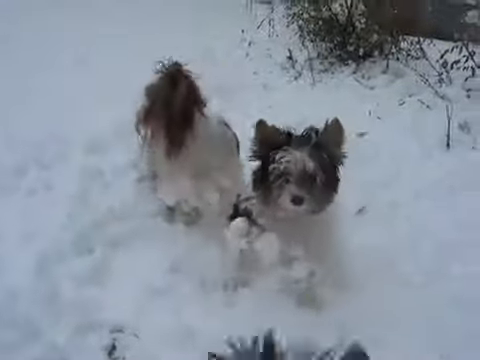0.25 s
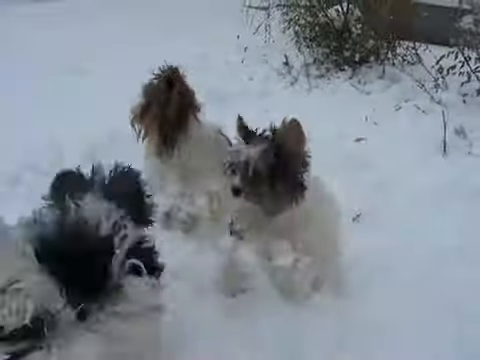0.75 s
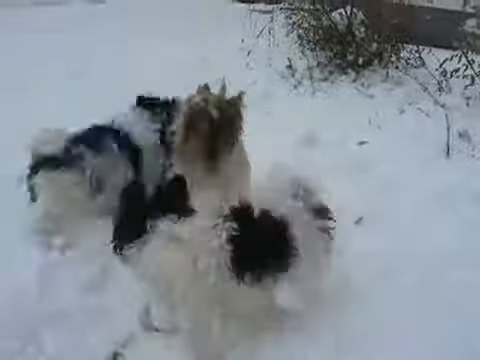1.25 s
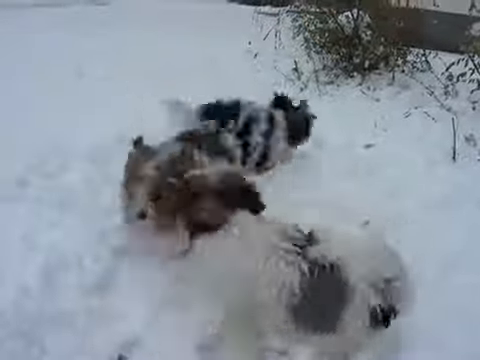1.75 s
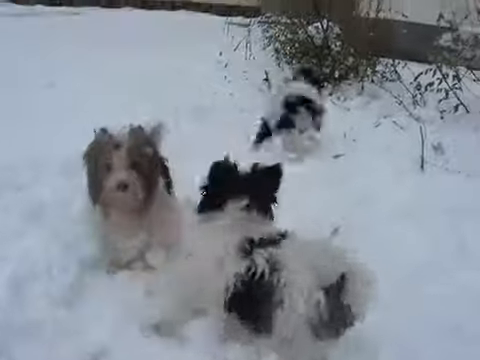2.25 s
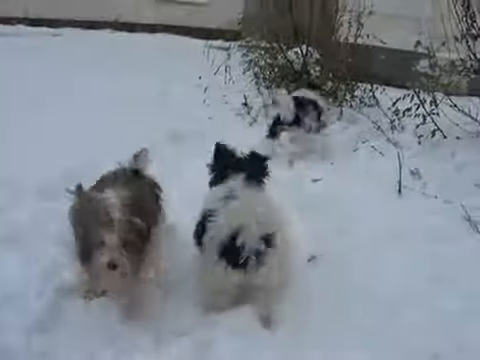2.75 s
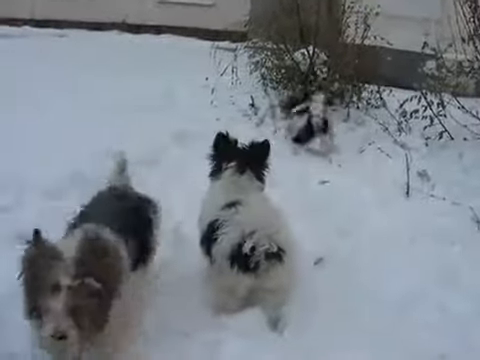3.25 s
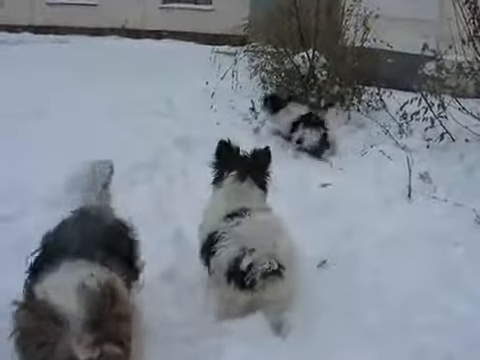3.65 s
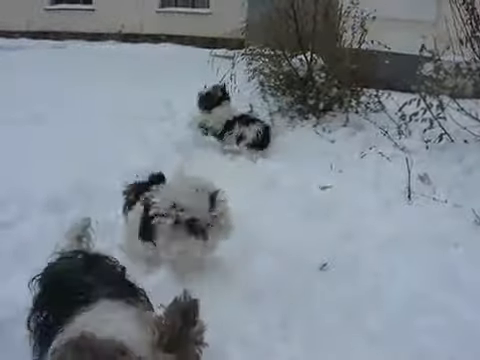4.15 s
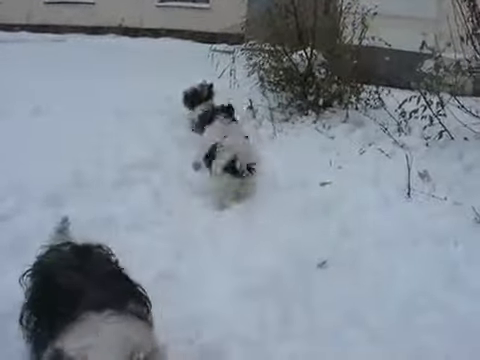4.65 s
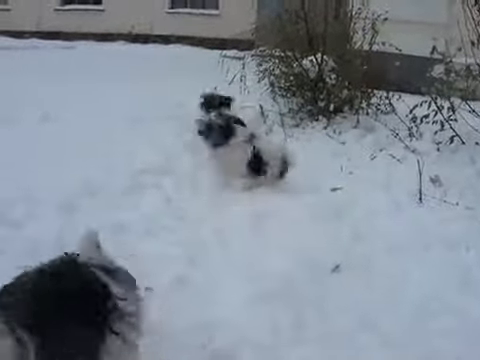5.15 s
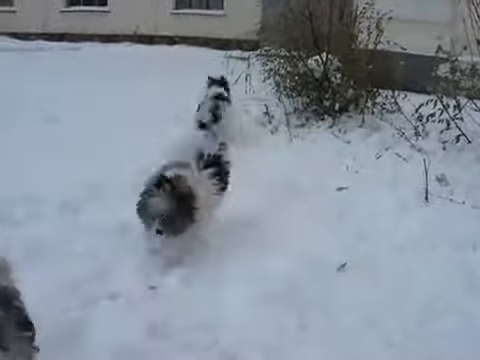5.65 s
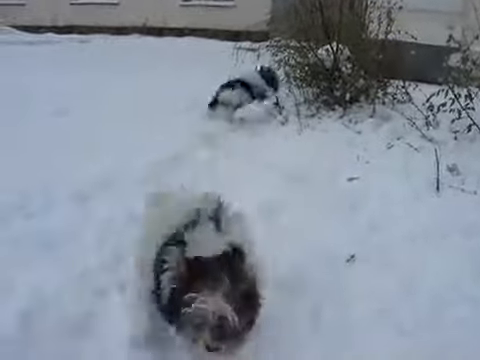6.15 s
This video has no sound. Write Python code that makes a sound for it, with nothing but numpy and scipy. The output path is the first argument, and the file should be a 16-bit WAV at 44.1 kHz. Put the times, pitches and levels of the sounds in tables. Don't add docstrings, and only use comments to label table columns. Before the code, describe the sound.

A constant dull broadband hiss with low traffic rumble and a slight hum fills a snowy yard, captured by a cheap, narrow-band microphone. From 0.2 to 0.7 s small paws tick and crunch lightly, with a few more steps at 1.0 to 1.2 s. A quick wavering double whimper comes at 1.55 to 1.65 s. At 1.9 s a puppy barks piercingly, the loudest moment, cracking into rasp and sliding into a short falling tail by 2.0 s; it overloads, the background ducks and slowly recovers, and walls answer with brief echoes. A short rising yip sounds at 2.5 s and a falling one at 2.75 s, ending low. After a pause, a clear high bark rings at 3.95 s. A faint growl mutters around 4.4 to 4.7 s. At 5.0 s comes a rough, hoarse, distorted bark with another dip. A barely audible whine at 5.7 s and soft steps finish by 6.4 s.

```python
import sys
import numpy as np
from scipy import signal
from scipy.fft import rfft, irfft
from scipy.io import wavfile
from scipy.ndimage import uniform_filter1d, map_coordinates

SR = 44100
rng = np.random.default_rng(int(sys.argv[2]) if len(sys.argv) > 2 else 0)


def transcribe(u):
    v = np.clip(np.atleast_2d(u).T, -1, 1)
    q = np.round(v * 32767).astype(np.int16)
    wavfile.write(sys.argv[1], SR, q)


def rack_gain(trim_db):
    fader = np.asarray(trim_db, float)
    return 10 ** (fader / 20)


N = 282725
T = np.arange(N) / SR

# time_s, level_db
HISS_LEVEL = [(0, -42.5), (.6, -42.5), (1.6, -42), (2.1, -40.5), (2.9, -43), (4.2, -42), (4.9, -44),
              (5.6, -41.5), (6.2, -42.5), (6.41, -40)]
# frequency_hz, density_db (per Hz)
HISS_SPECTRUM = [(38, -5), (90, -2.5), (333, -8.5), (544, -4), (888, -3.5), (1280, -9), (3700, -21),
                 (4400, -43)]
HUM_DB, RUSTLE_DB, TRAFFIC_DB = -57, -62, -6.5
# centre_s, rise_db, half_width_s
TRAFFIC_SWELLS = [(1.1, 5, .7), (3.5, 3.3, 0.89), (4.6, 3, 0.54), (6.41, 1.5, 0.14)]
HUM_SWELLS = [(.25, 8, 0.43), (1.0, 5, .2), (1.9, 5.5, .2), (2.5, 6, 0.37), (3.3, 5.5, 1), (4.7, 10, 0.53),
              (6.15, 8, 0.33)]
RUSTLE_SWELLS = [(.2, 8.5, 0.21), (2.15, 22.5, 0.18), (2.7, 10, 0.27), (4.3, -13, 0.42), (5.25, 13.5, 0.43),
                 (6.28, 13, 0.15)]

# start_s, peak_db, thud_hz, crunch_db, crunch_length_s
PAW_STEPS = [(0.21, -32.5, 500, -46, 0.01), (0.252, -39, 500, -60, .008), (0.308, -45, 500, -50, .006),
             (0.388, -30.5, 700, -42, 0.0032), (0.59, -28.5, 590, -44, 0.0043),
             (.672, -41, 450, -44, 0.017), (0.697, -38, 436, -44, 0.015), (.718, -38, 600, -47, .01),
             (1.002, -38, 900, -31.5, 0.0023), (1.006, -34, 700, -33, 0.005), (1.197, -41, 131, -58, .01),
             (1.212, -53, 120, -63, .01), (4.088, -38.5, 600, -44, 0.0039), (5.688, -39, 500, -42, 0.0075),
             (5.879, -47, 900, -40.5, 0.022), (6.1, -35.5, 600, -33.5, 0.0019),
             (6.276, -36, 415, -42, 0.0046)]
# time_s, level_db
GROWL_LEVEL = [(4.33, -63), (4.38, -41), (4.48, -41), (4.55, -46.5), (4.65, -49), (4.72, -46)]
# delay_s, level_db, smear_s
WALL_ECHOES = [(0.157, -46, 0.002), (0.19, -40, 0.01), (.25, -39.5, 0.0035), (0.284, -58, 0.041),
               (.44, -48.5, 0.0055)]
# delay_s, level_db
DIFFUSE_RETURN = [(.02, -36.5), (.1, -31), (.2, -42.5), (.3, -40), (.4, -44.5), (.6, -48.5), (.9, -58.5)]

# time_s, pitch_hz, level_db, mouth_opening_db (second over first partial), rasp_db (over clean voice)
WHIMPER_FIRST = [(1.541, 815, -33.5, -12, -30), (1.548, 774, -30, -4, -34), (1.56, 675, -29, -11.5, -28.5),
                 (1.567, 814, -22.5, -21, -31.5), (1.573, 830, -32.5, -16, -24.5)]
WHIMPER_SECOND = [(1.578, 638, -36, -13, -14), (1.589, 593, -31.5, -5, -25.5), (1.604, 554, -41.5, 1, -19),
                  (1.615, 576, -37.5, -0.5, -20.5), (1.622, 700, -28, -29, -22),
                  (1.627, 762, -22.5, -15.5, -32), (1.642, 676, -31.5, -23, -26.5),
                  (1.65, 620, -39.5, -13, -20), (1.662, 720, -29, -22, -30)]
BARK_LOUDEST = [(1.875, 880.4, -18.5, 25.5, 3), (1.882, 972, -11, -2.5, -32.5),
                (1.886, 1027, -4, 5.5, -18.5), (1.891, 1048, 3, -3, -31.5), (1.895, 1116, -14, 11, -13.5),
                (1.915, 1241, -15.5, -5.5, -8.5), (1.93, 1191, -16, 21, 3), (1.945, 1136, -22, -13.5, 8),
                (1.967, 1149, -19, 0, 3.5)]
BARK_SIGH = [(1.973, 1188, -18.5, -12, -9.5), (1.979, 1207, -13.5, -18.5, -20),
             (1.987, 1256, -23.5, -20.5, 1), (1.993, 1135, -18, -6.5, -24), (2.002, 1103, -27, -11, -25),
             (2.019, 982, -30, -12.5, -30)]
YIP_RISING = [(2.522, 657, -50, -10.5, -9), (2.534, 666, -36, -10.5, -21.5), (2.544, 749, -23, -6, -30.5),
              (2.548, 936, -19.5, -26, -41), (2.567, 1022, -22.5, -24, -28.5),
              (2.57, 1090, -36.5, -27, -28)]
YIP_FALLING = [(2.752, 924, -21, -17.5, -33), (2.772, 886, -26.5, -7.5, -35.5),
               (2.785, 914, -21.5, -17, -35), (2.794, 821, -19.5, -12, -38),
               (2.813, 723, -23.5, -14.5, -17.5), (2.822, 689, -24, -28, -7)]
YIP_LOW_END = [(2.83, 481, -29.5, -4, -25), (2.849, 461, -30, -4.5, -16), (2.863, 480, -34.5, -2.5, -18)]
BARK_CLEAR = [(3.93, 1052, -23, 0, -28), (3.94, 1316, -16.5, 0, -25), (3.956, 1398, -10, -7, -33),
              (3.968, 1371, -12, 0.5, -25.5), (3.975, 1217, -11.5, 8, -30), (3.982, 959, -15, -3.5, -23.5),
              (4.001, 960, -12.5, -6.5, -32), (4.021, 917.5, -16, -11.5, -25),
              (4.069, 904, -27, -14, -16.5)]
BARK_ROUGH = [(4.998, 946, -25.5, -4, -30.5), (5.009, 1114, -13.5, -13, -29),
              (5.015, 1204, -7, -5.5, -20.5), (5.02, 1210, -12, -7, -12.5), (5.045, 1286, -15.5, -6, 1.5),
              (5.052, 1199, -16, -9, 13), (5.075, 1190, -17, 2, -6), (5.087, 800, -18.5, -3, -5),
              (5.115, 789, -34.5, -1, 11)]
FAR_WHINE = [(5.71, 856, -41, -23, -22), (5.746, 872, -41, -23, -19), (5.76, 850, -45, -20, -24)]
VOICES = [WHIMPER_FIRST, WHIMPER_SECOND, BARK_LOUDEST, BARK_SIGH, YIP_RISING, YIP_FALLING, YIP_LOW_END,
          BARK_CLEAR, BARK_ROUGH, FAR_WHINE]
# third_under_voice_db, third_change_db_per_s, loudest_fourth_db
BRIGHTNESS = [
    (-31.5, 14, -55.5),
    (-27.5, 10, -58),
    (-3.5, -400, -46.5),
    (-19.5, -49.5, -56),
    (-24.5, 10, -64),
    (-34.5, 598, -39),
    (-17, 10, -43),
    (-11, -79.5, -26),
    (-5.5, -550, -42),
    (-15, 10, -74),
]
# start_s, start_hz, end_hz, length_s, level_db
PITCH_SLIPS = [(1.924, 3520, 3320, 0.015, -27.5), (1.931, 1767, 1100, 0.019, -17),
               (1.939, 2480, 1960, 0.013, -20.5), (1.948, 1942, 1137, 0.018, -18.5),
               (1.949, 3330, 2685, 0.014, -27), (1.956, 2250, 2160, .01, -23.5),
               (5.023, 2343, 2170, .012, -16.5), (5.044, 1445, 1655, .016, -21.5),
               (5.048, 2600, 1750, 0.0096, -20), (5.058, 1890, 1964, 0.021, -22),
               (5.084, 1048, 745, 0.014, -26.5)]
# centre_hz, width_hz, level_db
THROAT = [(850, 130, -10.5), (1540, 1100, -1), (2350, 1250, 0), (3380, 140, -5)]
FLUTTER_SHARES = [5.5, -2, -3.5]
ATTACK_S, RELEASE_S, EDGE_DB = .008, .013, 31.5
THIRD_FOLLOWS, WIDE_OPEN_DB = .39, 18.5
THIRD_EFFORT = .54
LIFT_HZ, LIFT_WIDTH_HZ, LIFT_DB = 4230, 300, 11
UPPER_WAVER_DB = 3.5

# start_s, depth_db, recovery_s
GAIN_DUCKS = [
    (1.892, -14.5, 0.64),
    (5.018, -10, 0.24),
]
DUCK_ATTACK_S = .003
# start_s, peak_db, frequency_hz
GAIN_JOLTS = [(1.889, -24.5, 149), (5.016, -26, 180), (5.048, -39, 308)]
# start_s, rise_s, end_s, step_amplitude
OFFSET_STEPS = [(1.885, .012, 2.028, .0185), (1.885, .012, 1.946, .007), (4.82, .06, 5.104, .0095)]
OFFSET_REST, OFFSET_FALL_S = -.0535, .013
CONVERTER_HZ, FULL_SCALE = 8000, .72


def curve(rows, t):
    s, *columns = np.transpose(rows)
    return [np.interp(t, s, c) for c in columns]


def swells(rows):
    return sum(db * np.exp(-((T - s) / width) ** 2) for s, db, width in rows)


def rms_one(x):
    return x / np.sqrt(np.mean(x ** 2) + 1e-20)


def drift(rate_hz, size):
    r = np.exp(-2 * np.pi * rate_hz / SR)
    noise = rng.standard_normal(size + 20000)
    return rms_one(signal.lfilter([1], [1, -2 * r, r * r], noise)[20000:])


def resonance(x, hz, width_hz):
    r = np.exp(-np.pi * width_hz / SR)
    zeros = np.array([1, 0, -1]) * (1 - r * r) / 2
    return signal.lfilter(zeros, [1, -2 * r * np.cos(2 * np.pi * hz / SR), r * r], x)


def band(x, low_hz, high_hz, order=2):
    return signal.sosfilt(signal.butter(order, [low_hz, high_hz], "band", fs=SR, output="sos"), x)


def add(out, s, piece):
    i = round(s * SR)
    out[i:i + len(piece)] += piece[:N - i]


def town_hiss(white):
    traffic_db = TRAFFIC_DB + swells(TRAFFIC_SWELLS)
    table_hz, table_db = np.transpose(HISS_SPECTRUM)
    edges = 30 * 2 ** np.arange(0, 7.4, 1 / 3)
    hiss = 0
    for k, (low, high) in enumerate(zip(edges, edges[1:])):
        level_db = np.interp(np.log(low * high) / 2, np.log(table_hz), table_db)
        level_db = level_db + drift(8.3, N) + (high < 300) * traffic_db
        hiss = hiss + rack_gain(level_db) * band(white[k % 2], low, high)
    bass_cut = signal.cheby2(8, 40, 84, "high", fs=SR, output="sos")
    return signal.sosfilt(bass_cut, hiss) + rack_gain(-9.5) * hiss


def yard():
    white = rng.standard_normal((4, N))
    hiss = town_hiss(white)
    hum = resonance(resonance(white[2], 900, 500), 900, 500) * rack_gain(1.8 * drift(12, N))
    rustle = resonance(white[3], 2680, 420) * rack_gain(2 * drift(40, N))
    out = rack_gain(curve(HISS_LEVEL, T)[0]) * rms_one(hiss)
    out += rack_gain(HUM_DB + swells(HUM_SWELLS)) * rms_one(hum)
    return out + rack_gain(RUSTLE_DB + swells(RUSTLE_SWELLS)) * rms_one(rustle)


def paws():
    out, t = np.zeros(N), np.arange(2000) / SR
    for s, peak_db, hz, crunch_db, length in PAW_STEPS:
        push = 4.26 * rack_gain(peak_db) * np.sin(2 * np.pi * hz * t) * np.exp(-1.3 * hz * t)
        push = band(push, .19 * hz, 1300, order=1)
        grains = rms_one(band(rng.standard_normal(len(t)), 400, 2300))
        crunch = grains * t / length * np.exp(1 - 2 * t / length) * 2
        add(out, s, push + rack_gain(crunch_db) * crunch)
    return out


def growl():
    cycles = np.cumsum(80 * (1 + .048 * drift(15, N))) / SR
    pulses = np.diff(np.floor(cycles), prepend=0) * rack_gain(2.9 * drift(33, N))
    throat = resonance(pulses, 860, 180) - .6 * resonance(pulses, 560, 200)
    inside = (T > GROWL_LEVEL[0][0]) & (T < GROWL_LEVEL[-1][0])
    return inside * rack_gain(curve(GROWL_LEVEL, T)[0]) * rms_one(throat)


def walls(x):
    t = np.arange(SR) / SR
    diffuse = rng.standard_normal(SR) / np.sqrt(.1 * SR)
    answer = (t > DIFFUSE_RETURN[0][0]) * rack_gain(curve(DIFFUSE_RETURN, t)[0]) * diffuse
    for delay, db, smear in WALL_ECHOES:
        burst = rng.standard_normal(round(smear * SR))
        add(answer, delay, rack_gain(db) * burst / np.sqrt(len(burst)))
    answer = band(answer, 800, 3800, order=1)
    answer = answer + rack_gain(3) * resonance(answer, 1300, 130)
    answer += rack_gain(4) * resonance(answer, 3000, 480) + rack_gain(-.5) * resonance(answer, 2000, 340)
    return signal.fftconvolve(x, answer)[:N]


def partials(cycles, levels_db):
    return sum(np.sqrt(2) * rack_gain(db) * np.cos(2 * np.pi * (k + 1) * cycles + 1.41 * k)
               for k, db in enumerate(levels_db))


def rough_breath(cycles, flutter, hz):
    size = len(cycles)
    sidebands = flutter * sum(rack_gain(db) * np.cos(2 * np.pi * (k + 1) * cycles)
                              for k, db in enumerate(FLUTTER_SHARES))
    closing = np.diff(np.floor(cycles), prepend=0)
    pattern = np.cos(2 * np.pi * np.floor(cycles) / 3 + .9 * drift(40, size))
    pulses = closing * (pattern + rng.uniform(-.7, .7, size)) + .08 * rng.standard_normal(size)
    source = rms_one(sidebands) + .7 * rms_one(band(pulses, 600, 4000))
    rasp = sum((-1) ** k * rack_gain(db) * resonance(source, centre, width)
               for k, (centre, width, db) in enumerate(THROAT))
    rasp = band(rasp, 800, 3750, order=5)
    power = uniform_filter1d(rasp ** 2, size=260)
    return rms_one(rasp / np.sqrt(power + .15 * np.mean(rasp ** 2)))


def call(rows, under_db, change_db, fourth_db):
    start, end = rows[0][0], rows[-1][0]
    t = np.arange(start - ATTACK_S, end + RELEASE_S, 1 / SR)
    hz, level_db, open_db, hoarse_db = curve(rows, t)
    edge = np.maximum(0, np.maximum((start - t) / ATTACK_S, (t - end) / RELEASE_S))
    level_db = level_db - EDGE_DB * edge
    voice_db = level_db - 10 * np.log10(1 + rack_gain(2 * hoarse_db))
    rasp_db = voice_db + hoarse_db
    first_db = voice_db - 10 * np.log10(1 + rack_gain(2 * open_db))
    second_db = first_db + open_db
    third_db = voice_db + under_db + change_db * (t - start)
    third_db += THIRD_FOLLOWS * np.minimum(open_db, WIDE_OPEN_DB)
    third_db += THIRD_EFFORT * (voice_db - voice_db.max())
    third_db += LIFT_DB * np.exp(-((3 * hz - LIFT_HZ) / LIFT_WIDTH_HZ) ** 2)
    fourth_db = np.minimum(fourth_db + 1.1 * (first_db - first_db.max()), third_db + 9.5)
    fifth_db = fourth_db - 7 - np.maximum(5 * hz - 4300, 0) / 30
    upper_db = [db + UPPER_WAVER_DB * drift(60, len(t)) for db in (third_db, fourth_db, fifth_db)]

    cycles = np.cumsum(hz * (1 + .0034 * drift(150, len(t)))) / SR
    clean = partials(cycles, [first_db, second_db, *upper_db])
    flutter = np.cos(2 * np.pi * cycles / 4 + 2.2 * drift(55, len(t))) * rack_gain(3 * drift(120, len(t)))
    rasp = rough_breath(cycles, flutter, hz)
    throb = np.clip(rack_gain(rasp_db - np.maximum(first_db, second_db)), 0, .45) * flutter
    beads = band(clean * throb, .96 * hz.min(), 4200, order=4)
    return clean + beads + rack_gain(rasp_db) * rasp


def pitch_slip(start_hz, end_hz, length, db):
    hz = np.linspace(start_hz, end_hz, round(length * SR))
    phase = 2 * np.pi * np.cumsum(hz) / SR
    tone = np.sin(phase) + rack_gain(-23.5) * np.sin(2 * phase)
    return np.sqrt(2) * rack_gain(db) * np.hanning(len(hz)) ** .5 * tone


def ducking():
    gain_db = 0
    for s, db, recovery in GAIN_DUCKS:
        attack = np.clip((T - s) / DUCK_ATTACK_S, 0, 1)
        gain_db = gain_db + db * attack * np.cos(np.pi / 2 * np.clip((T - s) / recovery, 0, 1)) ** 2
    return rack_gain(gain_db)


def puppies():
    out = np.zeros(N)
    for rows, brightness in zip(VOICES, BRIGHTNESS):
        add(out, rows[0][0] - ATTACK_S, call(rows, *brightness))
    for s, *slip in PITCH_SLIPS:
        add(out, s, pitch_slip(*slip))
    return out / ducking()


def scene():
    voices = puppies()
    return (yard() + paws() + growl() + walls(voices) + voices)[None]


def offset():
    out = OFFSET_REST
    for s, rise, end, step in OFFSET_STEPS:
        out = out + step * np.clip(np.minimum((T - s) / rise, (end - T) / OFFSET_FALL_S), 0, 1)
    return out


def slow_converter(x):
    soft = signal.sosfilt(signal.butter(4, 4300, fs=SR, output="sos"), x)
    count = 80 * (N // 441 + 1)
    times = np.arange(count) * SR / CONVERTER_HZ
    coarse = rfft(map_coordinates(soft, [times], order=3, mode="constant"))
    mirrored = np.concatenate([coarse, coarse[-2:0:-1].conj()])
    hz = np.arange(len(mirrored)) * CONVERTER_HZ / count
    slope_db = np.interp(hz, [3585, 3940, 4340, 4900, 5200], [.5, -10, -23, -64, -120])
    return irfft(mirrored * rack_gain(slope_db), count * 441 // 80)[:N] * SR / CONVERTER_HZ


def top_cut(x):
    return signal.sosfilt(signal.butter(12, 16000, fs=SR, output="sos"), x)


def record(dry):
    ducked = dry[0] * ducking()
    for s, peak_db, hz in GAIN_JOLTS:
        one_cycle = np.sin(2 * np.pi * np.arange(round(SR / hz)) * hz / SR)
        add(ducked, s, rack_gain(peak_db) * one_cycle)
    rounded = ducked / (1 + (ducked / .63) ** 4) ** (1 / 4)
    mix = np.clip(slow_converter(rounded) + offset(), -FULL_SCALE, FULL_SCALE)
    return top_cut(mix[None])


dry = scene()
out = record(dry)
transcribe(out)
```